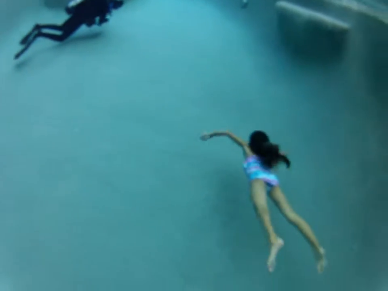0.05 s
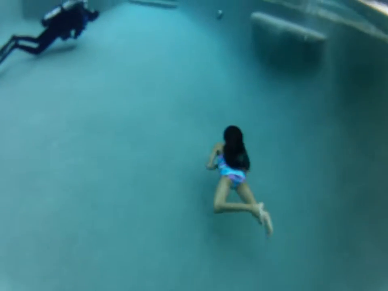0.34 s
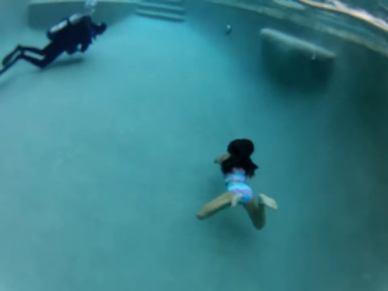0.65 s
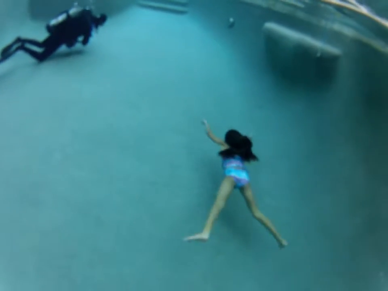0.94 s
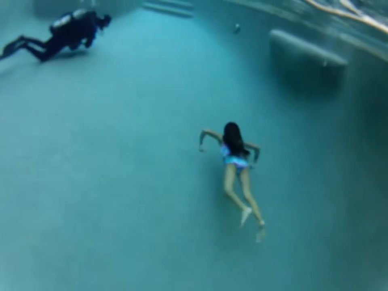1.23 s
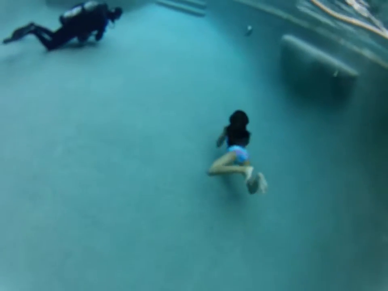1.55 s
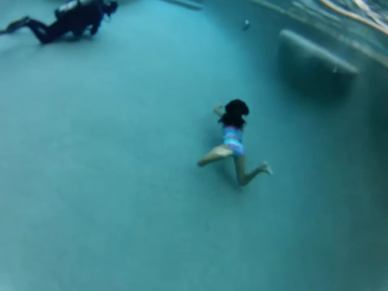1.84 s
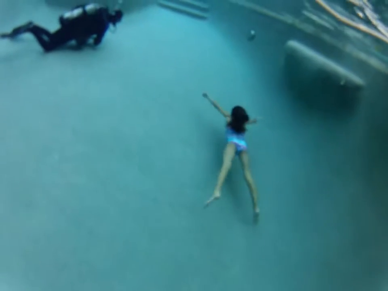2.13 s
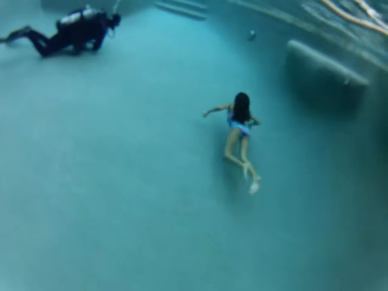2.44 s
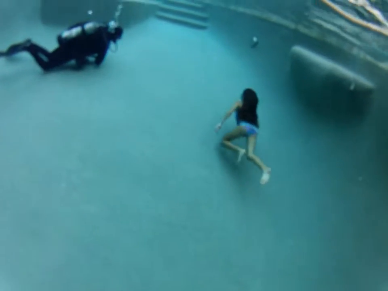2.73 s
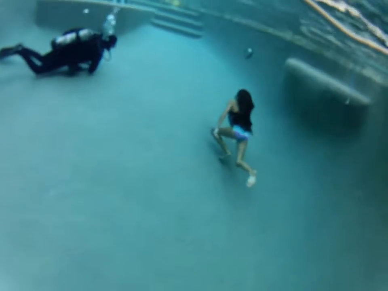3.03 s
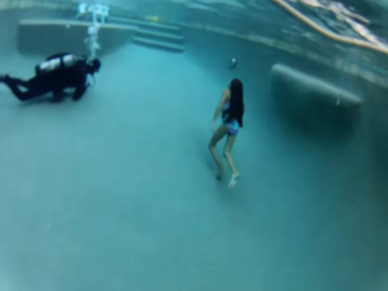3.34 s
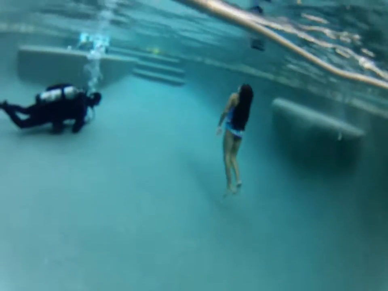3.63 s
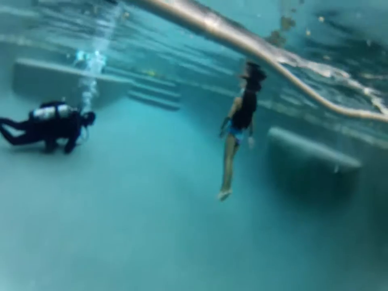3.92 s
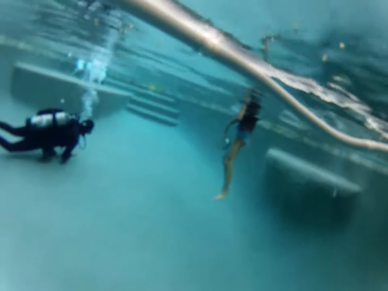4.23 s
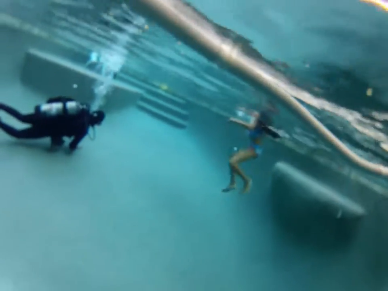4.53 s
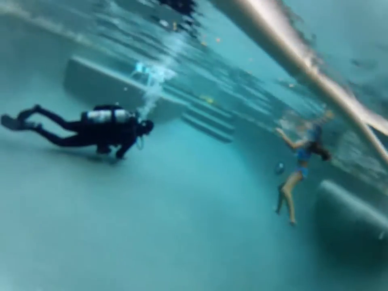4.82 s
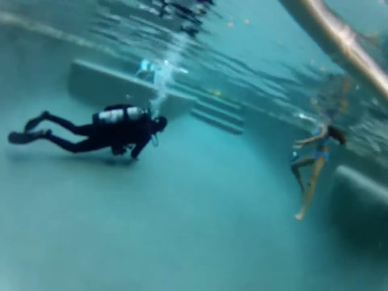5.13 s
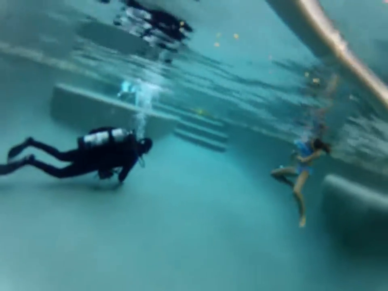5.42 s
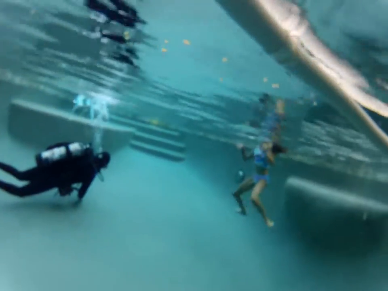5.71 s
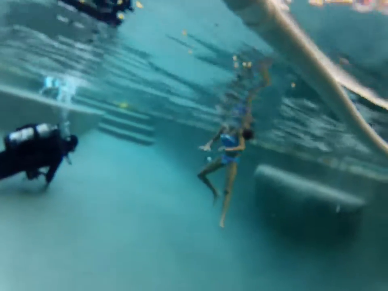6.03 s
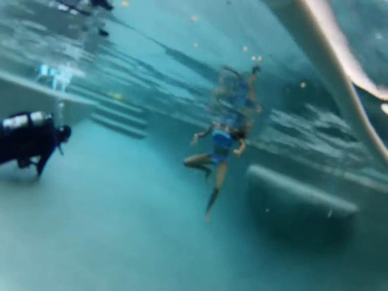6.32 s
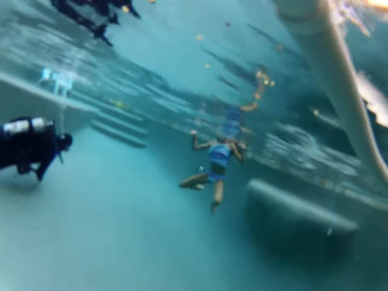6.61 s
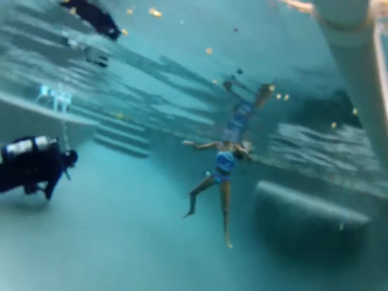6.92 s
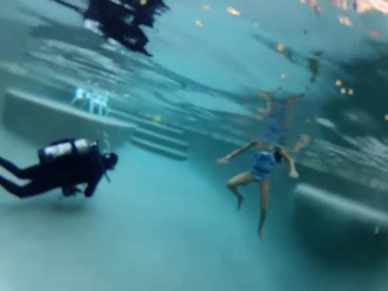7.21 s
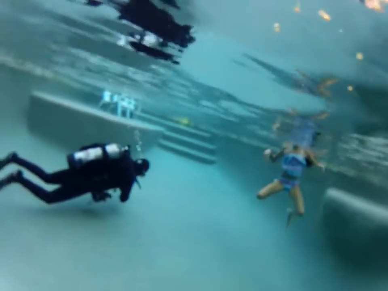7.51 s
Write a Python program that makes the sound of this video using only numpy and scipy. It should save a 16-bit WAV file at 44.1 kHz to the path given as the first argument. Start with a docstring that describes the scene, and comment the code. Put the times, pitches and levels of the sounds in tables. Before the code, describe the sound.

A submerged camera picks up muffled pool water rumbling softly while a diver's air bubbles away at a distance in two long stretches of gurgle and fizz. It opens with a cluster of dull bumps on the camera case and a swimmer's splash. Nearby bubbles plink and faint ticks come through the water, with a thin glitter in the treble. Small splashes, a sharp bubble and more bumps close it.

```python
"""Dull knocks and a rub on a waterproof camera housing, with a splash, heard under water in a pool.
Then a diver's air gurgles and fizzes some way off in two long plumes, each bubble ringing at its own
pitch, while a swimmer paddles at the surface. Single bubbles plink close by over a low rumble of water,
and the housing is knocked and rubbed again at the end. The camera samples at a low rate and holds
each sample, which mirrors every sound as a thin glitter in the treble."""
import sys
import numpy as np
from scipy import signal
from scipy.io import wavfile
from scipy.ndimage import uniform_filter1d

SR = 44100
rng = np.random.default_rng(int(sys.argv[2]) if len(sys.argv) > 2 else 0)


def to_wav(s):
    """Save 16-bit WAV."""
    ch = np.atleast_2d(s).T  # columns
    pcm = np.round(np.clip(ch, -1, 1) * 32767)  # PCM
    wavfile.write(sys.argv[1], SR, pcm.astype(np.int16))


N = 337806
TIME = np.arange(N) / SR

# Tone colours of the layers. Each row: frequency in Hz, relative level in dB.
RUMBLE_EQ = [(12, -4.5), (22, 0), (32, 15), (50, 12.5), (75, -3), (120, -33.5)]  # large eddies
CHURN_EQ = [(30, -14.5), (70, 0), (120, -2), (170, -3), (240, -4.5), (340, -8), (450, -14.5), (600, -11),
            (800, -22.5), (1300, -51.5)]  # small eddies
HISS_EQ = [(240, -25.5), (450, 0), (640, -2), (860, -5), (1500, -6), (2070, -11), (2830, -10.5),
           (3800, -11), (4700, -11), (5060, -9), (5350, -12.5), (5800, -17), (7500, -51)]  # camera electronics
SWISH_EQ = [(2000, -22), (3100, 3), (3900, 7), (4800, 1), (5800, -9)]  # stirred water
TICK_EQ = [(100, -33), (300, -4), (600, 13), (1000, 3), (1500, 2.5), (2400, 8.5), (3400, 1.5), (4500, -5.5),
           (5800, -20)]  # clicks through water
RUB_EQ = [(35, -23), (70, -12), (130, -5), (230, -8.5), (300, -5), (380, -3.5), (500, -2.5), (660, 5.5),
          (800, -38.5), (1000, -47), (1180, -19.5), (1450, -44), (2000, -53.5)]  # grip on the housing
FIZZ_EQ = [(500, -49), (850, -2.5), (964, -34), (1180, -3.5), (1560, -20.5), (1820, 0), (2020, 0),
           (2270, -1.5), (2490, -2), (2940, -19), (3700, -10), (4100, -25.5), (5850, -55.5)]  # small bubbles
GURGLE_EQ = [(160, -45), (280, -24.5), (307, -45), (333, -18), (365, -13), (435, -7.5), (533, -6.5),
             (585, -2.5), (615, 6), (651, 4), (770, -18.5), (866, -17.5), (950, -17), (1240, -74),
             (2090, -120)]  # large bubbles
# Faint whine of the electronics. Each row: pitch in Hz, rms level in dB.
WHINE_TONES = [(4992, -90), (5037, -92), (5043, -92), (5088, -82.5), (5136, -91)]
# Water surging past the camera.
# Each row: start in seconds, length in seconds, relative rumble in dB, relative churn in dB.
WATER_SURGES = [(0.24, 0.11, -48, -54.5), (2.334, 0.054, -56, -64), (2.8, 0.055, -61, -55.5),
                (3.2, 0.8, -59.5, -63), (5.35, 0.4, -55.5, -62), (5.9, 0.62, -59, -78),
                (7.13, 0.044, -54, -77)]
# Soft swishes of water. Each row: start in seconds, level in dB.
WATER_SWISHES = [(0.845, -64), (0.94, -65), (1.9, -64)]
# Dry ticks carried through the water. Each row: start in seconds, relative level in dB.
DRY_TICKS = [(0.6761, -47), (0.7427, -49.5), (0.822, -53), (0.9086, -48.5), (1.6101, -43), (1.7564, -48.5),
             (1.8774, -44.5), (2.088, -44.5), (2.5946, -48.5), (2.8447, -54), (3.5543, -47), (3.8524, -46),
             (3.9483, -50), (4.7745, -48), (4.9968, -49.5)]
# The grip rubbing the housing. Each row: start in seconds, length in seconds, relative level in dB.
GRIP_RUBS = [(0.268, 0.025, -33), (7.595, 0.035, -44.5), (7.65, 0.02, -40)]
# Ring of the housing. Each row: pitch in Hz, relative level in dB, time to fall 60 dB in seconds.
HOUSING_MODES = [(232.6, -16.5, 0.064), (298, -38, 0.043), (395, -104, 0.027), (494, -15.5, 0.085),
                 (576, -31, 0.081), (1120, -58, 0.055)]
# Knocks on the housing.
# Each row: start in seconds, relative level in dB, pitch in Hz, swell time in seconds.
HOUSING_KNOCKS = [(0.1511, -9.5, 487, 0.0035), (0.1596, -11, 515, 0.0031), (0.167, -11, 474, 0.0029),
                  (0.19, -22.5, 280, 0.001), (0.222, -19.5, 380, 0.002), (0.2373, -24, 405, 0.0017),
                  (0.247, -11, 497, 0.0024), (0.268, -15, 350, 0.004), (0.277, -18.5, 458, 0.0049),
                  (0.2843, -17.5, 560, 0.0038), (0.298, -21, 420, 0.0036), (0.3105, -19, 440, 0.0045),
                  (0.3305, -27, 580, 0.0043), (0.3529, -20, 437, 0.0032), (0.3935, -23, 500, 0.0019),
                  (7.589, -22.5, 627, 0.0071), (7.6415, -30, 607, 0.0055)]
# The swimmer's splashes.
# Each row: start in seconds, length in seconds, relative fizz in dB, relative gurgle in dB.
SWIMMER_SPLASHES = [(0.243, 0.12, -55, -48.5), (7.017, 0.036, -69.5, -65.5), (7.123, 0.05, -61, -60.5),
                    (7.553, 0.11, -60.5, -48)]
# The diver's air. Each row: time of full flow in seconds, length in seconds, relative level in dB.
AIR_PLUMES = [(-0.6, 2.68, -3), (3.05, 2.9, -0.1)]
# Large clusters of small bubbles let go at once.
# Each row: start in seconds, relative level in dB, centre pitch in Hz, time to fall 60 dB in seconds.
BUBBLE_CLUSTERS = [(0.2424, -38, 1300, 0.15), (0.271, -46, 1180, 0.17), (0.3316, -33.5, 1870, 0.29),
                   (0.4894, -37, 1940, 0.14), (0.6044, -40, 2020, 0.38), (1.3846, -43.5, 2230, 0.17),
                   (1.8073, -41, 2370, 0.072), (1.925, -43.5, 2300, 0.18), (2.3042, -46.5, 1820, 0.1),
                   (2.8244, -38.5, 1940, 0.088), (3.2375, -36, 2320, 0.089), (3.3836, -37, 2000, 0.69),
                   (3.4221, -32.5, 1970, 0.39), (4.0187, -44.5, 970, 0.33), (4.185, -40, 1990, 0.5),
                   (4.2575, -37.5, 1900, 0.41), (4.31, -43, 1290, 0.3), (4.455, -39.5, 2190, 0.39),
                   (5.8354, -33.5, 2095, 0.27), (7.1162, -32, 2080, 0.31), (7.253, -34, 1990, 0.16),
                   (7.3342, -40, 2390, 0.12)]
# Single bubbles close by. Each row: start in seconds, peak of the ring in dB, pitch in Hz.
NEAR_BUBBLES = [(0.435, -37.5, 635), (0.489, -41, 2150), (0.822, -39.5, 2034), (0.8865, -36.5, 675),
                (0.99, -41.5, 658), (1.282, -43, 664), (1.447, -43.5, 383), (1.552, -38, 603),
                (1.564, -39, 585), (1.611, -25.5, 2146), (1.625, -38, 2184), (1.6285, -45.5, 763),
                (2.1925, -31, 620), (2.212, -46.5, 1877), (3.1058, -33, 2536), (3.106, -35.5, 600),
                (3.108, -37, 470), (3.318, -45, 1155), (3.408, -45.5, 1194), (3.4935, -34.5, 618),
                (3.5455, -36.5, 652), (3.599, -38, 624), (3.9525, -45, 1060), (4.3985, -50, 1370),
                (4.6365, -40, 612), (4.774, -33, 653), (4.7755, -23, 2505), (4.774, -36.5, 1780),
                (5.826, -42.5, 642), (5.9205, -41, 602), (6.17, -43.5, 1845), (6.221, -44.5, 1880),
                (6.5927, -54, 1467), (6.931, -48, 577), (6.991, -42, 2355), (7.495, -39, 617),
                (7.509, -26, 662), (7.5115, -13, 1810), (7.529, -26, 612)]


def gain_of(db):
    """Decibels to a factor."""
    return 10 ** (np.asarray(db) / 20)


def unit_rms(x):
    """Scales to an rms of 1."""
    return x / np.sqrt(np.mean(x ** 2) + 1e-20)


def add(mix, s, sound):
    """Mixes a sound in at s seconds."""
    part = mix[max(round(s * SR), 0):][:len(sound)]
    part += sound[:len(part)]


def coloured(x, eq, size=4096):
    """A minimum-phase EQ, so that pops keep their attack; comes out at an rms of 1."""
    hz, db = np.transpose(eq)
    db = np.interp(np.log(abs(np.fft.fftfreq(size, 1 / SR)) + 1), np.log(hz + 1), db)
    log_gain = np.log(gain_of(np.maximum(db, -100)))
    response = np.fft.ifft(np.exp(np.conj(signal.hilbert(log_gain)))).real
    return unit_rms(signal.oaconvolve(x, response[:size // 2])[:N])


def noise(eq):
    """A steady bed of noise in the given colour."""
    return coloured(rng.standard_normal(N), eq)


def steadied(x, span_s):
    """Evens out the slow level of a texture and leaves its grain."""
    return x / np.sqrt(abs(uniform_filter1d(x ** 2, int(span_s * SR))) + 1e-6)


def swells(rows, rise_db_per_s, fade_db_per_s, sag_db_per_s=0, level_column=2):
    """A fader ride: each row rises up to its start, holds or sags for its length, then fades."""
    power = np.zeros(N)
    for row in rows:
        t, length_s = TIME - row[0], row[1]
        drop_db = rise_db_per_s * np.maximum(-t, 0) + sag_db_per_s * np.maximum(t, 0)
        drop_db += fade_db_per_s * np.maximum(t - length_s, 0)
        power += gain_of(row[level_column] - np.minimum(drop_db, 200)) ** 2
    return np.sqrt(power)


def pops(per_s, spread_db):
    """Random impulses: many small, a few large."""
    at = np.flatnonzero(rng.random(N) < per_s / SR)
    out = np.zeros(N)
    out[at] = rng.choice([-1, 1], len(at))
    out[at] *= gain_of(spread_db * np.minimum(rng.exponential(1, len(at)), 4))
    return out


def burst(t60, length_s=0.2):
    """A puff of noise that dies away."""
    t = np.arange(int(length_s * SR)) / SR
    return rng.standard_normal(len(t)) * gain_of(-60 * t / t60)


def pulsation(hz, swell_s, rise=0, softness=2):
    """A tone that swells to 1 and dies away, gliding up by the share `rise` per swell time."""
    age = np.arange(int(10 * swell_s * SR)) / (swell_s * SR)  # in swell times
    envelope = (age * np.exp(1 - age)) ** softness
    return envelope * np.sin(2 * np.pi * hz * swell_s * (age + rise * (age * age / 2 - age)))


def pool_echoes(x, t60, wet_db, delay_s):
    """Walls and surface return a short, dense patter of echoes."""
    t = np.arange(SR // 2) / SR
    taps = rng.standard_normal(len(t)) * (rng.random(len(t)) < 2500 / SR)
    taps *= (t > delay_s) * gain_of(-60 * t / t60)
    return x + gain_of(wet_db) * signal.oaconvolve(x, taps / np.linalg.norm(taps))[:N]


def electronics(hiss_db=-69):
    """The camera's own hiss and faint whine."""
    whine = sum(gain_of(db) * np.sqrt(2) * np.sin(2 * np.pi * hz * TIME) for hz, db in WHINE_TONES)
    return gain_of(hiss_db) * noise(HISS_EQ) + whine


def eddies(calm_rumble_db=-63.5, calm_churn_db=-58.5):
    """Large eddies rumble and small ones churn, swelling as water surges past."""
    large = gain_of(-1) * swells(WATER_SURGES, rise_db_per_s=50, fade_db_per_s=90)
    small = gain_of(1.5) * swells(WATER_SURGES, rise_db_per_s=50, fade_db_per_s=90, level_column=3)
    rumble = np.hypot(gain_of(calm_rumble_db), large) * steadied(noise(RUMBLE_EQ), span_s=0.37)
    churn = np.hypot(gain_of(calm_churn_db), small) * noise(CHURN_EQ)
    return rumble + churn


def swishes(hold_s=0.018):
    """Brief, bright rustles of stirred water."""
    rows = [(s, hold_s, db) for s, db in WATER_SWISHES]
    return swells(rows, rise_db_per_s=603, fade_db_per_s=220) * noise(SWISH_EQ)


def ticks(attack_s=0.00044):
    """Short clicks, dulled by the water: a crack, then a quick tail."""
    out = np.zeros(N)
    for s, db in DRY_TICKS:
        click = burst(t60=0.07) + gain_of(2) * burst(t60=0.0017)
        attack = 1 - np.exp(-TIME[:len(click)] / attack_s)
        add(out, s, gain_of(db) * click * attack)
    return np.std(out) * coloured(out, TICK_EQ)


def rubs():
    """The grip sticks and slips on the housing in a quick rattle."""
    slips = steadied(coloured(pops(per_s=600, spread_db=2), RUB_EQ), span_s=0.02)
    return gain_of(5) * slips * swells(GRIP_RUBS, rise_db_per_s=420, fade_db_per_s=150)


def knocks(ring_attack_s=0.0078):
    """Dull blows on the housing: a short honk over a low push, and the shell rings on briefly."""
    blows, impulses = np.zeros(N), np.zeros(N)
    for s, db, hz, swell_s in HOUSING_KNOCKS:
        add(blows, s, gain_of(db - 1) * pulsation(hz, swell_s, softness=3.5))
        add(blows, s, gain_of(db - 11) * pulsation(hz=290, swell_s=0.0017, softness=0.39))
        add(impulses, s, gain_of([db]))
    t = np.arange(SR // 4) / SR
    ring = sum(gain_of(db - 60 * t / t60) * np.sin(2 * np.pi * hz * t) for hz, db, t60 in HOUSING_MODES)
    ring *= 1 - np.exp(-t / ring_attack_s)
    return blows + signal.oaconvolve(impulses, ring)[:N]


def swarm(low_hz, high_hz, per_s, cycles, spread_db, bunch_db, rise, pitches, bunch_per_s=29):
    """A cloud of bubbles, each size ringing at its own pitch; neighbouring sizes come in bunches."""
    out = np.zeros(N)
    for pair in np.geomspace(low_hz, high_hz, pitches).reshape(-1, 2):
        wander = np.interp(TIME * bunch_per_s, np.arange(600), rng.standard_normal(600))
        for hz in pair:
            ring = pulsation(hz, cycles / hz * rng.uniform(1.0, 2.1), rise)
            births = gain_of(bunch_db * wander) * pops(per_s / pitches, spread_db)
            out += signal.oaconvolve(births, ring / np.linalg.norm(ring))[:N]
    return unit_rms(out)


def fizz(air, full_flow_db=-58, rest_db=-70.5):
    """Thousands of small bubbles and far splashes merge into a lumpy rush; a few strays plink in it."""
    cloud = swarm(850, 4300, per_s=2400, cycles=4, spread_db=2.2, bunch_db=3, rise=0.005, pitches=28)
    middle = swarm(950, 2300, per_s=16, cycles=4, spread_db=1.5, bunch_db=1, rise=0.01, pitches=12)
    high = swarm(2300, 3800, per_s=12, cycles=4, spread_db=2, bunch_db=1, rise=0.01, pitches=10)
    strays = gain_of(-73) * middle + gain_of(-75.5) * high
    strays = pool_echoes(strays, t60=0.072, wet_db=0, delay_s=0.0023)
    diver = gain_of(full_flow_db) * air ** 1.36 + gain_of(rest_db)  # fades faster than the gurgle
    swimmer = gain_of(6) * swells(SWIMMER_SPLASHES, rise_db_per_s=145, fade_db_per_s=59)
    strength = np.hypot(diver, swimmer)
    rush = strength * steadied(coloured(cloud, FIZZ_EQ), span_s=0.15)
    stray_strength = unit_rms(np.minimum(strength, gain_of(full_flow_db)) ** 0.95)
    return rush + stray_strength * strays


def gurgle(air, full_flow_db=-47.5):
    """Large bubbles wobble up from the diver, with a quick gulp from each splash."""
    cloud = swarm(300, 900, per_s=520, cycles=2.2, spread_db=2.8, bunch_db=1.2, rise=0.015, pitches=14)
    gulps = swells(SWIMMER_SPLASHES, rise_db_per_s=220, fade_db_per_s=110, level_column=3)
    strength = np.hypot(gain_of(full_flow_db) * air, gain_of(2.5) * gulps)
    return strength * steadied(coloured(cloud, GURGLE_EQ), span_s=0.1)


def spray(hz, t60, width):
    """A ragged spray of small bubbles: a puff of noise narrowed around one pitch."""
    band = signal.butter(1, [hz / (1 + width), hz * (1 + width)], "band", fs=SR, output="sos")
    high_cut = signal.butter(4, hz * 1.43, fs=SR, output="sos")
    puff = signal.sosfilt(high_cut, signal.sosfilt(band, burst(t60)))
    return puff / abs(puff).max()


def splutters(air, small_count=26, small_hz=2030):
    """Clusters of bubbles break loose: large ones on cue, small ones at random while air flows."""
    large, small = np.zeros(N), np.zeros(N)
    for s, db, hz, t60 in BUBBLE_CLUSTERS:
        add(large, s, gain_of(db - 5.5) * spray(hz, t60, width=0.038))
    for slot, (jitter, accent, detune) in enumerate(rng.uniform(-1, 1, (small_count, 3))):
        s = (slot + 0.5 + jitter / 2) / small_count * TIME[-1]
        puff = spray(small_hz * (1 + 0.11 * detune), t60=0.13, width=0.024)
        add(small, s, gain_of(-42.5 + 5 * accent) * puff)
    return large + air * small


def near_bubbles():
    """Each bubble snaps free, rings and sheds a spray; small, quiet ones sound the most ragged."""
    out = np.zeros(N)
    for s, db, hz in NEAR_BUBBLES:
        swell_s = 0.0079 * (1000 / hz) ** 0.55 / gain_of(db + 40) ** 0.24  # higher or louder is briefer
        snap = pulsation(hz, swell_s=0.95 / hz) / np.sqrt(1 + hz * swell_s)
        ragged = min(hz / 2000, 1) / (1 + gain_of(db + 37))
        add(out, s, gain_of(db + 4.5) * snap)
        add(out, s, gain_of(db) * pulsation(hz, swell_s, rise=0.0016))
        add(out, s, gain_of(db + 2) * ragged * spray(hz, t60=0.08, width=0.084))
    return pool_echoes(out, t60=0.013, wet_db=-21.5, delay_s=0.0027)


def scene():
    """The mono mix; the diver's air swells, sags and runs out, driving the bubble clouds."""
    air = swells(AIR_PLUMES, rise_db_per_s=32, fade_db_per_s=33, sag_db_per_s=3.5)
    bubbles = near_bubbles() + splutters(air) + gurgle(air) + fizz(air)
    return (bubbles + ticks() + swishes() + knocks() + rubs() + eddies() + electronics())[None]


def record(dry, camera_hz=12000, high_cut_hz=15600):
    """The camera's sample-and-hold mirrors the sound about its sampling rate; a high cut follows."""
    slow = signal.resample_poly(dry, camera_hz, SR, axis=1)
    held = signal.resample_poly(np.repeat(slow, 4, axis=1), SR, 4 * camera_hz, axis=1)[:, :N]
    high_cut = signal.firwin(401, high_cut_hz, window=("kaiser", 8), fs=SR)
    return signal.oaconvolve(held, high_cut[None], "same")


dry = scene()
out = record(dry)
to_wav(out)
```